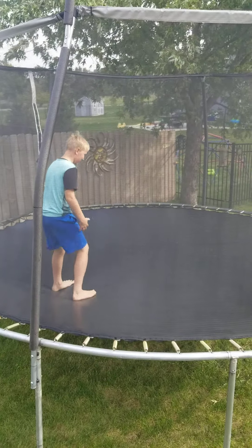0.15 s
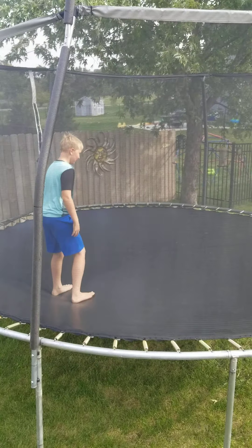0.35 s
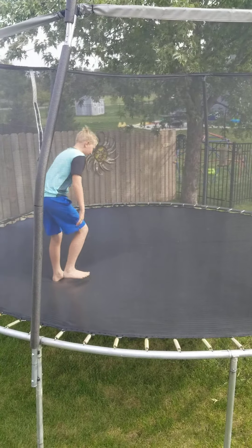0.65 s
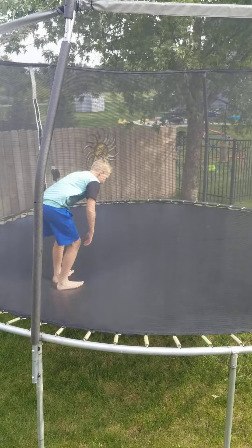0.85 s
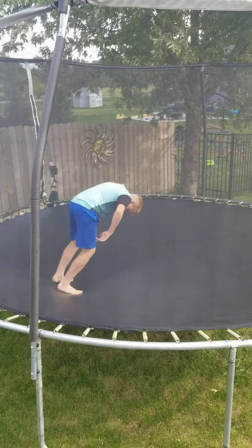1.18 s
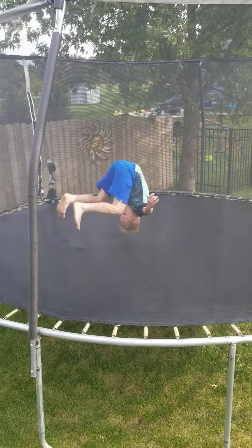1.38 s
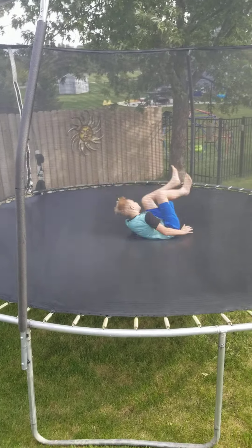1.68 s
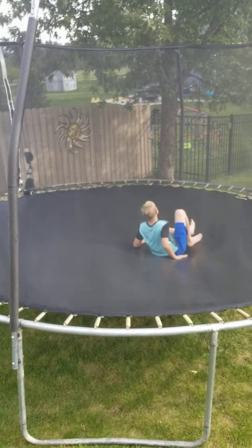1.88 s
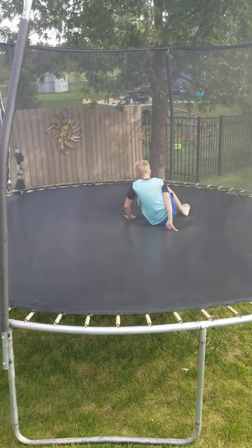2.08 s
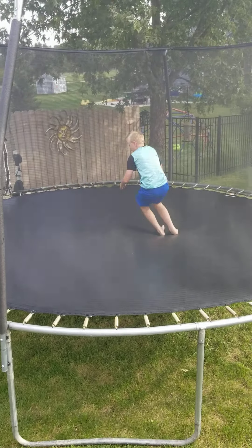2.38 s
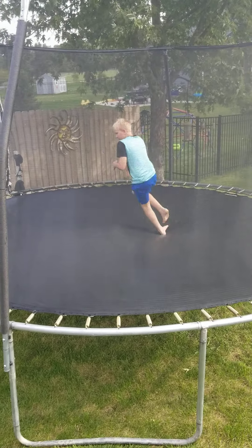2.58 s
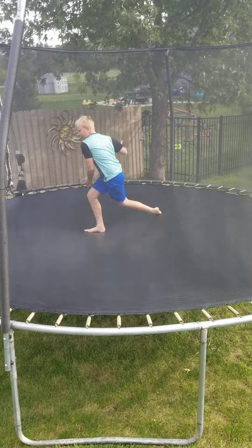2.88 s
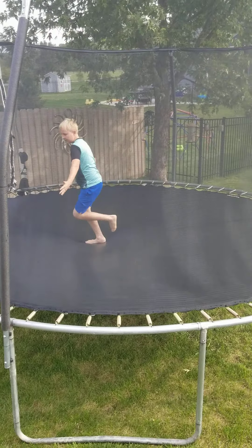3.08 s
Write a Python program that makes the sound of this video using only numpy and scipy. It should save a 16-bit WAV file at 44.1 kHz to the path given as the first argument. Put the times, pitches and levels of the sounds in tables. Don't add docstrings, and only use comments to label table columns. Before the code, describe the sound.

A trampoline's springs tick and creak under small steps, then rustle and thump louder as a child rolls over and gets up, ending in brisk metallic clicks; faint outdoor air, close stereo phone sound.

```python
import sys
import numpy as np
from scipy import signal
from scipy.fft import rfft, irfft
from scipy.io import wavfile
from scipy.ndimage import uniform_filter1d

SR = 44100
rng = np.random.default_rng(int(sys.argv[2]) if len(sys.argv) > 2 else 0)


def magnitude_from_level(level_db):
    exponent = np.asarray(level_db, float) / 20
    return 10 ** exponent


def transcribe(u):
    v = np.clip(np.atleast_2d(u).T, -1, 1)
    q = np.round(v * 32767).astype(np.int16)
    wavfile.write(sys.argv[1], SR, q)


N = 143325


def evened(x):
    return x / np.sqrt(np.mean(x ** 2) + 1e-20)


def read(points, hz):
    f, value = np.transpose(points)
    return np.interp(np.log(hz + 1), np.log(f + 1), value)


def pan(left_right_db):
    return magnitude_from_level(left_right_db * np.array([[.5], [-.5]]))


def add(mix, start_s, sound):
    part = mix[..., max(round(start_s * SR), 0):][..., :sound.shape[-1]]
    part += sound[..., :part.shape[-1]]


def wander(rate_hz, size):
    t = np.arange(size) / SR
    speeds = (.3, .47, .71, 1, 1.4, 2.1)
    return sum(np.sin(2 * np.pi * (rate_hz * k * t + rng.random())) for k in speeds) / np.sqrt(3)


def ports(x, lead_s):
    # pitch_hz, likeness (0 to 1)
    likeness = [(60, 0.43), (250, 0.9), (550, 1), (1200, 0.52), (4000, 0.18), (15000, 0.49)]
    # pitch_hz, left_right_db
    side_tilt = [(60, -2), (500, .6), (2000, -1.2), (12000, 1.8)]
    size = x.shape[1]
    hz = np.fft.rfftfreq(size, 1 / SR)
    first, second = rfft(x)
    same = np.clip(read(likeness, hz), -1, 1)
    delayed = np.exp(-2j * np.pi * lead_s * hz) * first
    right = same * delayed + np.sqrt(1 - same ** 2) * second
    side = magnitude_from_level(read(side_tilt, hz) / 2)
    return irfft(np.array([first * side, right / side]), size)


def bed(spectrum, db, swell_db, rate_hz, top_hz):
    hz = np.fft.rfftfreq(N, 1 / SR)
    colour = magnitude_from_level(read(spectrum, hz)) * (hz < top_hz) * (hz > 15)
    noise = irfft(rfft(rng.standard_normal((2, N))) * colour, N)
    swell = np.array([wander(rate_hz, size=N) for _ in noise])
    return evened(noise) * magnitude_from_level(db + swell_db * swell)


def outdoor_air():
    # pitch_hz, level_db
    air_colour = [(120, -5.5), (200, -4), (424, -10), (612, -43), (683, -13), (1300, -17), (4270, -17),
                  (4680, -15.5), (16000, -25)]
    return ports(bed(air_colour, -55, swell_db=-1.4, rate_hz=1.677, top_hz=15800), lead_s=0)


def light_wind():
    # pitch_hz, level_db
    wind_colour = [(12, -51), (30, 3), (62, 11), (114, 9.5), (187, -8.5), (226, -8), (500, -6.5),
                   (650, -22), (1100, -120)]
    return bed(wind_colour, -56.5, swell_db=2.5, rate_hz=7.9, top_hz=630) * pan(-9.5)


def ring(shape, tilt_db, treble_db, grit):
    # pitch_hz, level_db
    body_colour = [(180, -17.5), (300, -8.5), (489, -15.5), (1060, -4.5), (1280, -9.5), (1400, -2),
                   (1850, -4), (3260, -4.5), (5500, -7.5), (7000, -16.5), (9100, -44), (15400, -120)]
    # pitch_hz, level_db
    treble_colour = [(3530, -30), (6000, -7), (7040, -5), (11000, -7), (16000, -11)]
    # pitch_hz, level_db (over the body), fade_s (to -60 dB)
    spring_modes = [(909, 9.5, 0.051), (1385, 1.5, 0.037), (1580, 3, 0.13), (2375, 15, 0.26),
                    (2940, 9, 0.017), (3190, 8, 0.077), (4060, 9.5, 0.05), (4820, -17, 0.15),
                    (5190, 14, 0.14), (6250, 19, 0.091), (8260, 12, 0.051), (10240, 0, 0.13)]
    size = 16384
    hz = np.fft.rfftfreq(size, 1 / SR)

    grit_per_s = 6000
    specks = rng.standard_normal(size) * (rng.random(size) < grit_per_s / SR)
    specks *= np.sqrt(SR / grit_per_s)
    drive = (rng.standard_normal((2, size)) + grit * specks)[:, :len(shape)] * shape

    detune, spread_db, ring_db = .05, 4, -6
    draw = rng.standard_normal((len(spring_modes), 2))
    f, db, fade_s = np.transpose(spring_modes)[:, :, None]
    f = f * (1 + detune * draw[:, :1])
    strength = magnitude_from_level(db + ring_db + spread_db * np.clip(draw[:, 1:], -3, .6))
    resonance = 1 / (1 + 1j * (hz - f) * np.pi * fade_s / np.log(1000) * 2)
    modes = 1 + (strength * resonance).sum(0)

    low = magnitude_from_level(read(body_colour, hz) + tilt_db * np.log2(hz / 2000 + 0.13)) * modes * (hz > 200)
    high = magnitude_from_level(read(treble_colour, hz)) * modes
    blend = np.clip((hz - 5500) / 1500, 0, 1)
    low, high = low * (1 - blend), high * blend
    colour = low / np.sqrt(np.mean(abs(low) ** 2))
    colour = colour + magnitude_from_level(treble_db) * high / np.sqrt(np.mean(abs(high) ** 2))

    rung = irfft(rfft(drive, size) * colour, size)
    heard = ports(rung, lead_s=.0001 * rng.standard_normal())
    return heard[:, :len(shape) + 6000] / np.sqrt(1 + grit ** 2)


def scuffs():
    # start_s, length_s, level_db, tilt_db (per octave), treble_db
    rubs = [(0, 0.085, -51.5, -4.5, -12), (0.218, 0.14, -50.5, -0.3, -3.5), (0.34, 0.27, -49, 1.2, -13),
            (0.563, 0.17, -49, 2, -0.5), (0.999, 0.24, -47, -1, -14.5), (1.193, 0.16, -46, -0.2, -10.5),
            (1.31, 0.1, -49, 0.5, -7.5), (1.396, 0.18, -55, 0, -12), (1.527, 0.19, -56, -3, -7),
            (1.674, 0.064, -51, -5, -3), (1.741, 0.14, -40.5, 5.5, -11), (1.776, 0.11, -34.5, -3, -8),
            (1.853, 0.12, -41.5, -2.5, -5.5), (1.955, 0.14, -35, 3, -5), (2.035, .13, -42.5, 2, -2),
            (3.209, 0.044, -46, 1.5, -1), (2.269, 0.074, -47.5, -2, -9.5), (2.35, 0.088, -48, 4, -10),
            (2.403, 0.13, -39, -1, -3), (2.474, 0.057, -39.5, -4.5, -13), (2.549, 0.28, -55.5, -5, -31),
            (2.729, 0.49, -48.5, -0.5, -11.5), (2.949, 0.11, -42, 0.5, -13),
            (3.036, 0.14, -43.5, -2.5, -13), (2.13, 0.16, -53, -2, -20), (2.505, 0.11, -52, -3, -9),
            (2.621, 0.14, -55, -2, -16), (3.119, 0.18, -56, -1.5, -3)]
    peak_at, flutter_db = 0.39, 1.5
    out = np.zeros((2, N))
    for start_s, length_s, db, tilt_db, treble_db in rubs:
        length = min(length_s, .23) * SR
        u = np.arange(round(length)) / length
        swell = np.sin(np.pi * u ** (np.log(.5) / np.log(peak_at)))
        flutter = magnitude_from_level(db + flutter_db * wander(45.1, size=len(u)))
        add(out, start_s, ring(swell * flutter, tilt_db, treble_db, grit=magnitude_from_level(-11.5)))
    return out


def mat():
    # start_s, level_db, pitch_hz, fade_s (to -60 dB), left_right_db
    pushes = [(.015, -58.5, 598, 0.07, 6), (0.031, -51.5, 308, 0.14, -1), (.09, -52.5, 252, 0.1, .1),
              (.29, -51.5, 100, .12, -3), (0.399, -53, 70.5, 0.14, -6), (1.209, -54, 64, 0.17, -18),
              (.66, -50.5, 114, 0.14, 2), (.86, -56, 93, 0.63, -12), (0.919, -49.5, 87, 0.34, 4),
              (1.771, -51, 72.5, 0.57, 1), (1.795, -40, 265, 0.11, 1), (1.83, -35.5, 117, 0.064, -1),
              (1.86, -46, 205, 0.21, -2), (1.92, -47, 149.5, 0.17, 0), (2.065, -38.5, 72, 0.077, 2),
              (2.439, -25.5, 89.4, 0.069, -8), (2.446, -40, 189, 0.08, 5), (2.463, -45, 59, 0.2, 18),
              (2.497, -39, 86.6, 0.21, 12), (2.505, -37, 100, .07, -12), (2.534, -35.5, 69.6, 0.12, 13.5),
              (2.594, -49, 69.5, 0.062, -17), (2.59, -47.5, 252, 0.07, -1), (2.719, -62.5, 69.6, 1, -13),
              (3.14, -52, 71.4, 0.41, -18), (3.199, -54.5, 55.6, 0.34, -15)]
    rise_cycles, sag, puff_db, fade_bend = 0.85, 0.254, -2, 1.065
    out = np.zeros((2, N))
    t = np.arange(12000) / SR
    for start_s, db, hz, fade_s, left_right_db in pushes:
        rise = 1 - np.exp(-t * hz / rise_cycles)
        shape = rise * magnitude_from_level(db - 60 * (t / fade_s) ** fade_bend)
        band = signal.butter(2, [hz / SR, 3 * hz / SR], "band")
        puff = evened(signal.lfilter(*band, rng.standard_normal((2, len(t)))))
        sagging_hz = hz * (1 - sag * np.minimum(t / fade_s, 1))
        push = np.sin(2 * np.pi * np.cumsum(sagging_hz) / SR)
        both = push + magnitude_from_level(puff_db) * ports(puff, lead_s=0)
        add(out, start_s, 2 * pan(left_right_db) * shape * both)
    return out


def ticks():
    # start_s, level_db (peak), tilt_db (per octave), treble_db
    hook_ticks = [(0.239, -38.5, -2, 4), (0.349, -34, 5, -12), (0.372, -25, 0.5, -15),
                  (0.403, -29, -1.5, -11), (0.425, -28, 2, -13), (0.453, -27.5, -0.5, -11.5),
                  (0.48, -26, 1.2, -14), (0.499, -30.5, -1, -14), (0.596, -42, -1, -13),
                  (0.936, -26.5, 1, -10), (1.012, -35.5, -1.5, 2), (1.031, -30, -0.5, -7),
                  (1.079, -38, 0, -20), (1.106, -30, -4.5, -11), (1.13, -30, -2.5, -14),
                  (1.185, -28.5, 0.5, -6.5), (1.223, -28, 10, -14), (1.245, -27.5, 3, -11),
                  (1.284, -30, -2, -3), (1.339, -37, -3.5, -1), (1.427, -35, -1.5, -17),
                  (1.729, -33, -4.5, -10), (1.756, -33, 6, -3.5), (1.766, -32.5, 3, -10),
                  (1.901, -30.5, -6, -17), (1.96, -37.5, 8, 5), (2.189, -31.5, -2, -11),
                  (2.277, -45, 1, -10), (2.354, -34.5, -12, -8), (2.409, -33.5, 1, -13),
                  (2.577, -30, -4, -25), (2.629, -29.5, -1.5, -12), (2.722, -36.5, -2, -23),
                  (2.848, -34, -4, -14), (2.884, -32.5, 2, -19), (2.954, -25, 0.5, -8),
                  (2.965, -27, 1.5, -12), (2.984, -23, 0, -10), (3.045, -21.5, -0.2, -9),
                  (3.067, -25, 4.5, -9), (3.109, -19.5, 5, -4.5), (3.216, -37.5, 11, 6.5)]
    rise_s, level_db, fade_s = 0.0019, -8.5, 0.069
    out = np.zeros((2, N))
    t = np.arange(6000) / SR
    for start_s, db, tilt_db, treble_db in hook_ticks:
        shape = np.minimum(t / rise_s, 1) * magnitude_from_level(db + level_db - 60 * t / fade_s)
        add(out, start_s, ring(shape, tilt_db, treble_db, grit=0.16))
    return out


def singing_springs():
    # start_s, length_s, pitch_hz, level_db
    songs = [(1.965, .07, 4670, -50), (1.975, .05, 5350, -49), (2.99, .1, 5400, -52),
             (3.11, .07, 5400, -50), (3.11, .06, 10140, -57), (2.75, .09, 6400, -60),
             (2.405, .025, 1450, -52), (2.41, .06, 6450, -56), (2.19, .04, 2200, -59), (.47, .1, 5250, -61),
             (1.03, .13, 2950, -60), (1.245, .04, 5300, -59), (2.85, .09, 5300, -60),
             (1.765, .04, 2950, -52), (.94, .07, 4050, -63), (2.495, .025, 1080, -50), (.48, .06, 960, -60),
             (2.275, .04, 5300, -60), (.6, .09, 6300, -64), (1.8, .04, 1420, -48)]
    width_hz = 80
    out = np.zeros((2, N))
    for start_s, length_s, hz, db in songs:
        t = np.arange(0, length_s, 1 / SR)
        r = np.exp(-np.pi * width_hz / SR)
        resonance = [1, -2 * r * np.cos(2 * np.pi * hz / SR), r * r]
        fuzz = signal.lfilter([1], resonance, rng.standard_normal((2, 4000 + len(t))))
        tone = evened(ports(fuzz, lead_s=0)[:, 4000:])
        add(out, start_s, magnitude_from_level(db) * np.sin(np.pi * (t / length_s) ** .5) * tone)
    return out


def squeaks():
    # start_s, length_s, level_db, pitch_hz (slips per second)
    slips = [
        (2.962, .06, -46, 817),
        (2.008, .03, -47, 817),
    ]
    # multiple of the pitch, level_db
    overtones = [(1, 1), (2, 2.5), (3, -1)]
    out = np.zeros((2, N))
    for start_s, length_s, db, hz in slips:
        t = np.arange(0, length_s, 1 / SR)
        turns = np.cumsum(hz * (1 + .006 * wander(60, size=len(t)))) / SR
        tone = sum(magnitude_from_level(g) * np.sin(2 * np.pi * k * turns) for k, g in overtones)
        add(out, start_s, magnitude_from_level(db) * np.sin(np.pi * t / length_s) * tone * np.ones((2, 1)))
    return out


def snap():
    snap_s, snap_hz, width_s = 2.0434, 2630, 0.00032
    out = np.zeros((2, N))
    t = np.arange(-200, 200) / SR
    burst = np.exp(-.5 * (t / width_s) ** 2) * np.cos(2 * np.pi * snap_hz * t)
    add(out, snap_s - 200 / SR, magnitude_from_level(-14) * pan(-4) * burst)
    return out


def patchy(x):
    z = signal.stft(x, nperseg=256, noverlap=192)[2]
    patches = uniform_filter1d(rng.standard_normal(z.shape[1:]), size=2, axis=0)
    patches = evened(uniform_filter1d(patches, size=16, axis=1))
    return signal.istft(z * magnitude_from_level(2.2 * patches), nperseg=256, noverlap=192)[1][:, :N]


def yard(x):
    echo_db, fade_s = -11, .2
    t = np.arange(8000) / SR
    sparse = rng.standard_normal((2, 8000)) * (rng.random((2, 8000)) < .05)
    taps = sparse * magnitude_from_level(-60 * t / fade_s) * (t > .004)
    echoes = signal.fftconvolve(x, taps / np.linalg.norm(taps[0]), axes=1)[:, :N]
    return x + magnitude_from_level(echo_db) * echoes


def scene():
    background = outdoor_air() + light_wind()
    rubs_and_ticks = patchy(scuffs() + ticks())
    hooks = singing_springs() + squeaks() + snap()
    return background + yard(rubs_and_ticks + hooks) + mat()


def roll_off(x):
    return signal.sosfilt(signal.butter(12, 16000, fs=SR, output="sos"), x)


def record(dry):
    edge = signal.firwin(2047, 15930, window=("kaiser", 9), fs=SR)
    limited = signal.oaconvolve(dry, edge[None], "same")
    return roll_off(limited)


dry = scene()
out = record(dry)
transcribe(out)
```